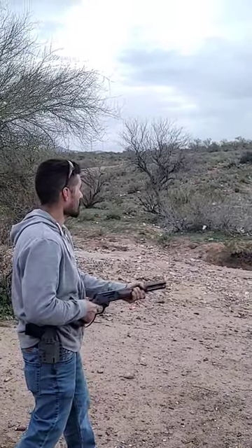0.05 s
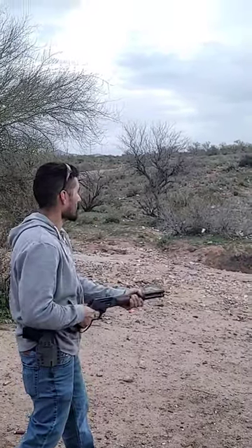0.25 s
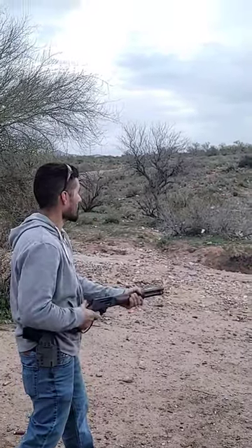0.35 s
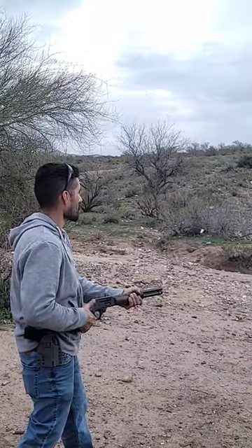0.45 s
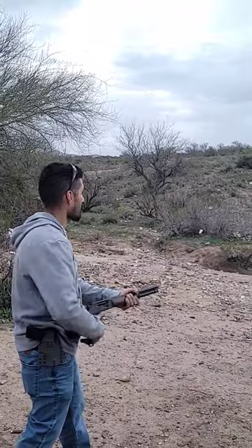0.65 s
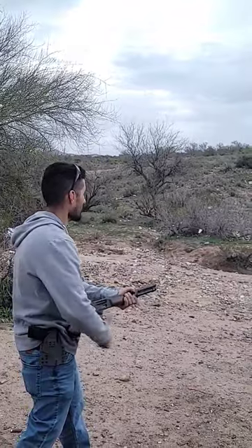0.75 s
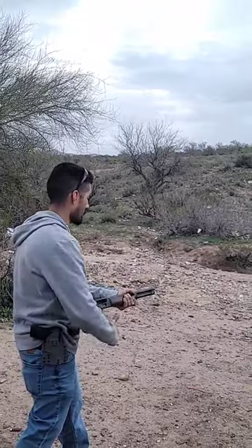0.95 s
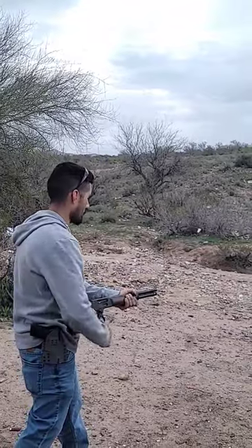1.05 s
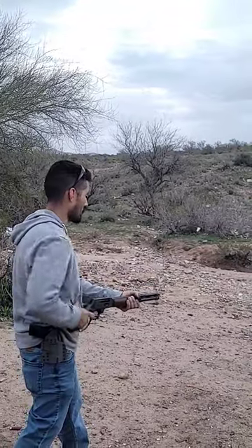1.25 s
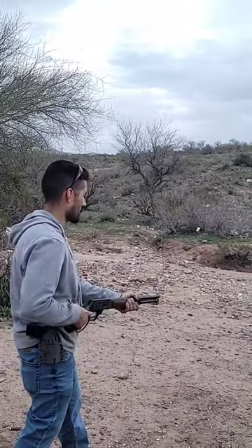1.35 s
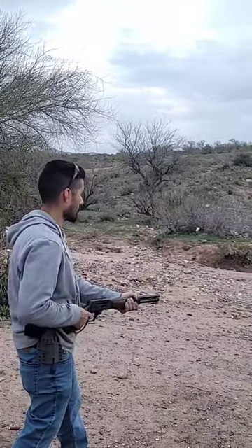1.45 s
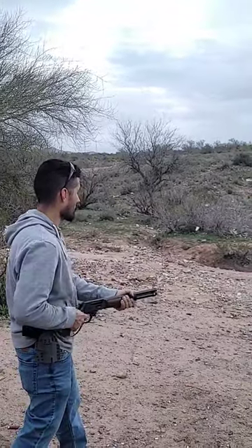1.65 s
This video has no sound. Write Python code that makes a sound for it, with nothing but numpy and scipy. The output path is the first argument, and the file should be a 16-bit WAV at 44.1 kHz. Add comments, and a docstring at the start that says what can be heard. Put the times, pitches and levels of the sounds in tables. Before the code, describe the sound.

A single sharp gunshot from a lever-action gun a few metres from stereo microphones, quick gritty echoes from ground and slopes, then quiet metallic lever clicks and an empty case tinkling on stones.

```python
"""Open stony ground: one shot from a short lever gun, a few metres from a stereo pair of microphones.
The blast is a pressure pulse, a noise crack and a slow swing, mostly of the left microphone. Shaped noise answers
from ground and scrub, then rolls away over the slopes with single slaps. The lever clicks and slides (noise through
steel rings), a sleeve rustles, the empty case drops on the stones (decaying sines and ticks), and something bumps
dully near the right port. Light wind puffs on each microphone port, over a soft breeze and hiss."""
import sys
import numpy as np
from scipy import signal
from scipy.fft import rfft, irfft, next_fast_len
from scipy.io import wavfile
from scipy.ndimage import uniform_filter1d, map_coordinates

SR = 44100
rng = np.random.default_rng(int(sys.argv[2]) if len(sys.argv) > 2 else 0)


def to_linear_factor(level_db):
    """Convert decibel levels (scalar or array-like) to linear amplitude factors."""
    exponent = np.asarray(level_db, float) / 20
    return 10 ** exponent


def unload_audio(sound):
    """Save the sound as a 16-bit wav file, at the path given as the first command line argument."""
    columns = np.transpose(np.atleast_2d(sound))
    # keep every value between -1 and 1, then stretch to whole-number steps
    steps = np.round(np.clip(columns, -1, 1) * 32767)
    wavfile.write(sys.argv[1], SR, steps.astype(np.int16))


N = 74970
T = np.arange(N) / SR  # s

# In all noise colours: pitch_hz, density_db (per Hz, relative: the noise is scaled to rms 1 afterwards).
# In all likenesses: pitch_hz, left_right_likeness (clipped to -1..1).
# Muzzle crack colour: pitch_hz, density_db
CRACK_COLOUR = [(350, -30.5), (600, -2), (1820, -14), (2610, -22.5), (7380, -25.5), (8720, -36.5),
                (14000, -21), (16500, -34.5)]
# Answer of ground and scrub close by: time_s, level_db
NEAR_LEVEL = [(.245, -44.5), (.252, -24.5), (.258, -16.5), (.266, -15), (.279, -15.5), (.283, -20.5),
              (.296, -20), (.301, -27), (.34, -40), (.45, -90)]
# Its colour: pitch_hz, density_db
NEAR_COLOUR = [(71, -35), (120, -5), (300, -4.5), (832, -5), (1680, -2), (2600, -11.5), (5000, -17),
               (14900, -24.5), (15600, -26.5), (16000, -50)]
# Its likeness: pitch_hz, left_right_likeness
NEAR_ALIKE = [(150, 0.3), (500, 0), (1200, -0.24), (4000, -0.24), (12000, 0.092)]
# Roll from slopes further off: time_s, level_db (before trim and wobble)
FAR_LEVEL = [(0.299, -35), (.37, -39.5), (0.419, -44.5), (0.488, -43.5), (.54, -50), (0.672, -59),
             (.77, -74), (.95, -85.5)]
# Its colour at first: pitch_hz, density_db
FAR_COLOUR = [(59, -32.5), (100, -10), (304, -2.5), (384, -9), (684, -10), (1220, -11.5), (2080, -8.5),
              (2680, -15), (14500, -28.5), (15500, -27.5), (15900, -59.5)]
# Its loss with time: pitch_hz, loss_db_per_s
FAR_LOSS = [(100, -23.5), (300, 35), (600, 2.5), (1000, -23), (1500, -9), (2200, 17.5), (5000, 18),
            (8000, 44.5), (15000, 86)]
# Its likeness: pitch_hz, left_right_likeness
FAR_ALIKE = [(60, -1.2), (240, 1), (950, -0.25), (3770, 0.22), (15000, 0.76)]
# Strong band of the roll, sinking with distance: time_s, centre_hz
HOLLOW = [(.3, 1950), (.48, 2020), (.56, 1290), (.65, 958), (.75, 880)]
# Stereo balance of all echoes: pitch_hz, left_minus_right_db
ECHO_BALANCE = [(60, -4), (240, -3), (950, 0.5), (3770, -1.5), (15000, -1)]
# Single strong echoes: start_s, level_db (before trim), centre_hz, t60_s
SLAPS = [(.337, -15.5, 1600, 0.015), (0.363, -20.5, 2090, 0.013), (0.3932, -18.5, 1050, 0.015),
         (0.396, -23.5, 2000, 0.0087), (0.442, -28.5, 1896, 0.12), (0.4693, -17, 1813, 0.019),
         (.470, -27.5, 3506, 0.017), (.766, -56.5, 4300, .033)]
# Lever clicks: start_s, level_db (before trim), rise_s, t60_s, low_clack_db (under about 2500 Hz), own_ring_hz
CLICKS = [(.709, -55.5, .001, .024, -6, 7500), (0.7205, -42, .0041, .018, -4.5, 7500),
          (.8582, -63, 0.00094, .031, 0, 4200), (0.873, -48.5, .00065, .013, -6, 7260),
          (.887, -59, 0.0031, 0.019, -1, 5200), (.912, -47.5, 0.003, 0.027, -12, 7200),
          (.951, -67, .002, 0.037, -13, 3600), (1.1579, -69, .001, .021, -20, 7800),
          (1.1713, -61, .0005, .014, -11, 7800), (1.1816, -60, 0.00049, .011, -17, 7695),
          (1.1914, -57.5, 0.00079, .015, -17, 5000), (1.2222, -57.5, .0005, 0.033, -9, 6000),
          (1.235, -58.5, 0.0022, 0.033, 2, 3980), (1.287, -58, .0005, 0.044, -9, 4700),
          (1.2975, -54, .001, 0.016, -3, 8200), (1.3028, -46, .0017, 0.024, -7, 10700),
          (1.3209, -49.5, .002, 0.026, -16, 6200), (1.3293, -41, .0031, 0.0093, -9.5, 7500)]
# Lever slides: start_s, end_s, level_db (before wobble), low_clack_db (under about 2500 Hz)
SLIDES = [(1.118, 1.2, -84.5, -24), (0.84, .905, -74, -10), (.91, 0.92, -65, -14.5),
          (1.299, 1.305, -64.5, -6), (1.315, 1.326, -64.5, 0.5)]
# Colour shared by the steel parts: pitch_hz, density_db
STEEL_COLOUR = [(400, -17), (800, 1.5), (1800, 8), (2840, -7), (4420, 0.5), (6460, -4), (7530, -1.5),
                (8760, -12.5), (10900, -2.5), (12000, -8), (15500, -3.5), (16000, -30)]
# Rings shared by the steel parts: pitch_hz, half_width_hz, level_db (before each stroke's random offset)
STEEL_RINGS = [(1920, 71, -3), (4300, 320, -11), (7500, 890, -5.5), (13900, 590, 3.5)]
# Case bounces: start_s (before lag), level_db (before trim), left_minus_right_db, hollow_knock_db (under 2000 Hz)
CASE_DROPS = [(1.495, -44, -4.5, -6), (1.5074, -50, 8, -12), (1.6016, -55, -2.5, -7.5),
              (1.666, -63, -5, -20), (1.6794, -60.5, 8, -9)]
# Rings of the empty case: pitch_hz (before detune), level_db (before random offset), t60_s
CASE_RINGS = [(1404, -1, 0.032), (1600, -11, 0.011), (3380, -24, 0.031), (5520, -7.5, 0.014),
              (7850, -19, 0.031), (11300, -7.5, 0.0094), (15100, -21, 0.0089)]
# Cloth rustle as the arm swings: start_s, end_s, level_db (before wobble)
SLEEVE = [(0.768, 0.925, -70.5), (1.111, 1.34, -73.5)]
# Cloth colour: pitch_hz, density_db
CLOTH_COLOUR = [(210, -49), (400, -7), (675, -1), (891, -7), (2100, -5), (2700, -16), (6500, -25),
                (11000, -120)]
# Parts of the dull bump: pitch_hz, level_db (relative), t60_s
THUMP = [(59.8, 1.5, 0.1), (181, -9, 0.035), (1020, -18, .03)]
# Wind puffs: time_s, level_db (before trim and wobble), left_minus_right_db
PUFFS = [(0.0, -74.5, 8), (0.124, -58.5, 2), (0.162, -43.5, 18), (0.192, -56, 8), (0.22, -38.5, 9),
         (0.33, -54.5, 12), (0.42, -67, 21), (0.538, -50, -22), (0.604, -68, -12), (0.664, -61.5, -11.5),
         (0.79, -76, -15), (0.868, -59.5, -6.5), (0.89, -81, 4), (0.94, -55.5, -24.5), (0.97, -63, -23),
         (1.02, -73.5, -16), (1.054, -58, -31), (1.146, -65.5, -16), (1.248, -63, -15.5), (1.294, -81, 2),
         (1.394, -67, -42), (1.474, -85, -17), (1.588, -60, -16), (1.638, -77.5, -12), (1.7, -58, -7)]
# Puff colour: pitch_hz, density_db
PUFF_COLOUR = [(12, -38), (20, -10), (70, 2.5), (192, -18.5), (300, -27), (500, -36), (1100, -120)]
# Soft breeze: time_s, level_db (before trim and wobble)
BREEZE = [(0.0, -76.5), (0.204, -64), (0.22, -58.5), (0.8, -75), (0.93, -83), (1.332, -82.5),
          (1.552, -78.5), (1.7, -70.5)]
# Breeze colour: pitch_hz, density_db
AIR_COLOUR = [(88, -33), (150, -0.5), (206, -9), (821, -11), (1250, -22.5), (1700, -22), (1830, -42.5),
              (3500, -56.5), (7700, -120)]
# Microphone hiss colour: pitch_hz, density_db
HISS_COLOUR = [(880, -37), (1500, 0), (2400, -10.5), (2940, -15), (15500, -18.5), (16000, -26.5)]

SHOT_S = 0.2413
# Pressure pulse; the pairs of PUNCH_HZ and PUNCH_WIDE_S are before and after its deepest point
PUNCH_S, PUNCH_LAG_S = 0.2447, 0.00015  # deepest point on the left; right side later
PUNCH_HZ, PUNCH_WIDE_S = (446, 300), (0.001, 0.0018)
PUNCH_DB = (-2, -9.5)  # left, right
SWING_S, SWING_HZ, SWING_WIDE_S = 0.2605, 53.6, 0.011  # slow microphone swing
SWING_START_S, SWING_RISE_S = 0.2465, 0.002
SWING_DB = (-6, -28.5)  # left, right, before the bell envelope
CRACK_DB, CRACK_HOLD_S, CRACK_T60_S = -11.5, 0.0062, 0.019  # hold counts from the shot
GRAINY_DB, ROLLING_DB = 2.5, 3  # random level spread: near answer, patches of the far roll
HOLLOW_DB, HOLLOW_WIDE = 5.5, 0.22  # height; width as a natural-log ratio
SLAP_TONE = 1.13  # sine amplitude against noise of rms 1
SLIDE_T60_S, SCRAPE_DB = 0.025, 4.5  # decay and level wobble of a slide
OWN_RING_DB, OWN_RING_WIDE = 5.5, 0.083  # height of a click's own ring; half width over its pitch
TICK_T60_S, TICK_LAG_S = 0.007, 0.0008
DETUNE = 0.012  # share of ring pitch per dB of random offset
RUSTLE_DB = 2.2  # level wobble of the cloth
THUMP_S, THUMP_DB, THUMP_PAN_DB = 0.973, -42, -31  # pan is left minus right
HISS_DB = -87
TOP_HZ = 16800


def unit(x):
    """Scale to rms 1."""
    return x / np.sqrt(np.mean(x ** 2) + 1e-20)


def along(points, hz):
    """Read (pitch_hz, value) points on a log frequency axis."""
    point_hz, value = np.transpose(points)
    return np.interp(np.log(hz + 1), np.log(point_hz + 1), value)


def curves(rows):
    """One value per sample for each column after the time."""
    time_s, *columns = np.transpose(rows)
    return [np.interp(T, time_s, column) for column in columns]


def wobble(rate):
    """A smooth random curve with rate knots a second."""
    knots = rng.standard_normal(int(N * rate / SR) + 4)
    return map_coordinates(knots, [T * rate])


def filtered(x, response):
    """Shape the spectrum of x by a response of frequency."""
    size = next_fast_len(N + 8192)
    spectrum = rfft(x, size) * response(np.fft.rfftfreq(size, 1 / SR))
    return irfft(spectrum, size)[..., :N]


def rush(colour, alike):
    """Stereo noise of rms 1; the mid and side shares set its left-right likeness at each pitch."""
    def response(hz):
        turn = np.arccos(np.clip(along(alike, hz), -1, 1)) / 2
        return to_linear_factor(along(colour, hz)) * np.array([np.cos(turn), np.sin(turn)])

    mid, side = filtered(rng.standard_normal((2, N)), response)
    return unit(np.array([mid + side, mid - side]))


def burst(start, rise, end, t60):
    """Envelope: linear rise, hold until end, exponential decay."""
    attack = np.clip((T - start) / max(rise, 1e-4), 0, 1)
    return attack * to_linear_factor(-60 * np.maximum(T - end, 0) / t60)


def sides(pan_db):
    """Left and right gain for a left-minus-right level: only the weaker side is turned down."""
    return to_linear_factor(np.array([np.minimum(pan_db, 0 * T), np.minimum(-pan_db, 0 * T)]))


def blast():
    """A skewed pressure pulse, a short noise crack from the muzzle and the slow swing of the microphones."""
    u = np.array([T, T - PUNCH_LAG_S]) - PUNCH_S
    hz = np.where(u < 0, *PUNCH_HZ)
    wide = np.where(u < 0, *PUNCH_WIDE_S)
    punch = -np.cos(2 * np.pi * hz * u) * np.exp(-(u / wide) ** 2 / 2)
    punch = punch * to_linear_factor(PUNCH_DB)[:, None]

    v = T - SWING_S
    swing = -np.sin(2 * np.pi * SWING_HZ * v) * np.exp(-(v / SWING_WIDE_S) ** 2 / 2)
    swing = swing * burst(SWING_START_S, SWING_RISE_S, 2, 1)  # only the rise falls within the scene

    crack_noise = rush(CRACK_COLOUR, [(700, -0.59), (5000, -0.29)])
    crack_force = burst(SHOT_S, 0.0012, SHOT_S + CRACK_HOLD_S, CRACK_T60_S)
    crack = to_linear_factor(CRACK_DB) * crack_noise * crack_force
    return punch + crack + swing * to_linear_factor(SWING_DB)[:, None]


def near_answer():
    """Ground and scrub close by scatter the shot into dense, grainy noise."""
    level_db = curves(NEAR_LEVEL)[0] + GRAINY_DB * wobble(400)
    return to_linear_factor(level_db) * rush(NEAR_COLOUR, NEAR_ALIKE) * (T > SHOT_S)


def far_roll():
    """Slopes further off return a long patchy roll that loses its treble while its hollow band sinks."""
    hz, t, z = signal.stft(rush(FAR_COLOUR, FAR_ALIKE), SR, nperseg=512)
    patches = uniform_filter1d(rng.standard_normal(z.shape[1:]), size=5, axis=0)
    patches = unit(uniform_filter1d(patches, size=4, axis=1))
    centre = np.interp(t, *np.transpose(HOLLOW))
    hollow_db = HOLLOW_DB * np.exp(-(np.log((hz[:, None] + 1) / centre) / HOLLOW_WIDE) ** 2)
    loss_db = along(FAR_LOSS, hz)[:, None] * np.clip(t - 0.35, 0, 0.6)
    z = z * to_linear_factor(ROLLING_DB * patches + hollow_db - loss_db)
    roll = signal.istft(z, SR, nperseg=512)[1][:, :N]
    level_db = curves(FAR_LEVEL)[0] + 2.0 + 1.5 * wobble(40)
    first_s, last_s = FAR_LEVEL[0][0], FAR_LEVEL[-1][0]
    return roll * to_linear_factor(level_db) * burst(first_s - 0.02, 0.02, last_s, 0.91)


def slaps():
    """Single strong echoes: short bursts of noise around a centre pitch, plus a sine at that pitch."""
    out = 0
    for start_s, db, hz, t60 in SLAPS:
        colour = [(hz / 4, -40), (hz / 2, -10), (hz, 0), (hz * 2, -9), (hz * 3, -30), (hz * 6, -70)]
        body = rush(colour, [(500, 0.2)]) + SLAP_TONE * np.sin(2 * np.pi * hz * T)
        out = out + to_linear_factor(db - 10.5) * body * burst(start_s, 0.002, start_s + 0.00099, t60)
    return out


def echoes():
    """Near answer, far roll and slaps, leaning left or right by pitch."""
    half = np.array([[0.5], [-0.5]])  # left, right share of the level difference
    mix = near_answer() + far_roll() + slaps()
    return filtered(mix, lambda hz: to_linear_factor(along(ECHO_BALANCE, hz) * half))


def lever():
    """Steel parts click and scrape; all share one noise and a few rings, each stroke stirs them its own way."""
    steel = rush(STEEL_COLOUR, [(2000, 0.42), (8000, 0.2)])
    strokes = []  # force, low clack in dB, gain and pitch of its own ring
    for start_s, end_s, db, low_db in SLIDES:
        level = to_linear_factor(db + SCRAPE_DB * wobble(500))
        strokes.append((level * burst(start_s, 0.0024, end_s, SLIDE_T60_S), low_db, 0, 1))
    for start_s, db, rise, t60, low_db, own_hz in CLICKS:
        force = to_linear_factor(db - 6.5) * burst(start_s, rise, start_s + rise, t60)
        strokes.append((force, low_db, to_linear_factor(OWN_RING_DB), own_hz))

    out = 0
    stir_db = rng.normal(0, 1.9, (len(strokes), len(STEEL_RINGS)))
    for (force, low_db, own, own_hz), offsets_db in zip(strokes, stir_db):
        def colour(f):
            rings = 1 + own / (1 + ((f / own_hz - 1) / OWN_RING_WIDE) ** 2)
            for (hz, width, db), offset_db in zip(STEEL_RINGS, offsets_db):
                rings = rings + to_linear_factor(db + offset_db) / (1 + ((f - hz) / width) ** 2)
            return rings * to_linear_factor(low_db / (1 + (f / 2500) ** 4))

        out = out + filtered(force * steel, colour)
    return out


def case():
    """The empty case bounces on the stones: each hit sets off decaying rings and a bright noise tick."""
    out = np.zeros((2, N))
    for start_s, db, pan_db, knock_db in CASE_DROPS:
        hit_s = start_s + TICK_LAG_S
        u = np.maximum(T - hit_s, 0)
        chance_db = rng.normal(0, 2.3, (len(CASE_RINGS), 2, 1))  # per ring and side; also detunes
        ring = 0
        for (hz, level_db, t60), offset_db in zip(CASE_RINGS, chance_db):
            ring_db = level_db + offset_db + knock_db * (hz < 2000) - 60 * u / t60
            ring = ring + to_linear_factor(ring_db) * np.sin(2 * np.pi * hz * (1 + DETUNE * offset_db) * u)
        tick = 1.1 * rng.standard_normal((2, N)) * burst(hit_s, 0.0003, hit_s, TICK_T60_S)
        bright_tick = np.diff(tick, prepend=0)  # differencing thins the lows
        out = out + to_linear_factor(db + 1.0) * sides(pan_db) * (ring + bright_tick)
    return out


def sleeve():
    """Cloth rustles softly while the arm works the lever: patchy noise with slow edges."""
    force = sum(to_linear_factor(db) * burst(start_s, 0.034, end_s, 0.23) for start_s, end_s, db in SLEEVE)
    return force * to_linear_factor(RUSTLE_DB * wobble(60.8)) * rush(CLOTH_COLOUR, [(1000, 0.11)])


def thump():
    """One dull bump near the right port: a decaying low sine with a short knock on top."""
    u = np.maximum(T - THUMP_S, 0)
    body = sum(to_linear_factor(db - 60 * u / t60) * np.sin(2 * np.pi * hz * u) for hz, db, t60 in THUMP)
    return -to_linear_factor(THUMP_DB) * sides(THUMP_PAN_DB) * body


def wind():
    """Low noise puffs, almost unrelated on the two ports, over a soft breeze and the hiss of the microphones."""
    puff_db, pan_db = curves(PUFFS)
    flutter_db = 2.4 * np.array([wobble(21), wobble(30)])  # left, right
    puffs = to_linear_factor(puff_db + 3.5 + flutter_db) * sides(pan_db) * rush(PUFF_COLOUR, [(60, 0.0022)])
    breeze_db = curves(BREEZE)[0] + 2.0 + 0.73 * wobble(31)
    breeze = to_linear_factor(breeze_db) * rush(AIR_COLOUR, [(300, 0.79), (2000, 0.17)])
    hiss = to_linear_factor(HISS_DB) * rush(HISS_COLOUR, [(500, 0.0012)])
    return puffs + breeze + hiss


def scene():
    """All sources together."""
    return blast() + echoes() + lever() + case() + sleeve() + thump() + wind()


def band_limit(x):
    """A steep low-pass at the top of the band."""
    return signal.sosfilt(signal.butter(12, 16790, fs=SR, output="sos"), x)


def record(dry):
    """Cut everything from TOP_HZ upward and finish the mix."""
    mix = filtered(dry, lambda hz: hz < TOP_HZ)
    return band_limit(mix)


dry = scene()
out = record(dry)
unload_audio(out)
```